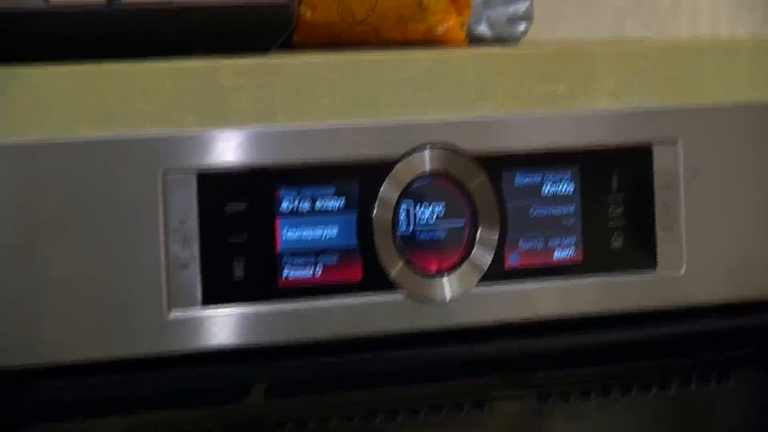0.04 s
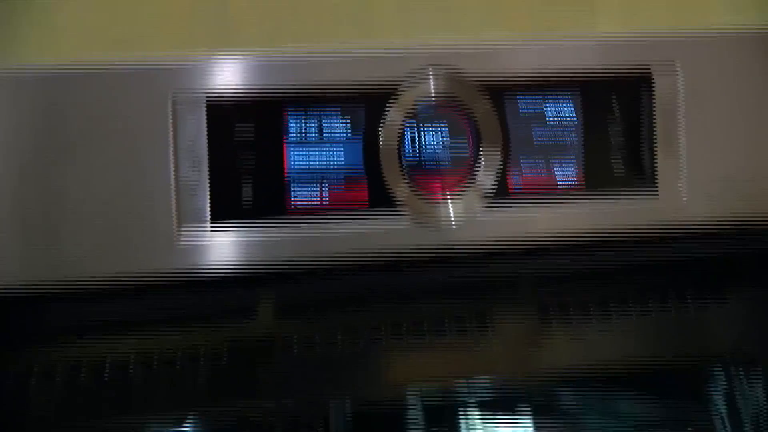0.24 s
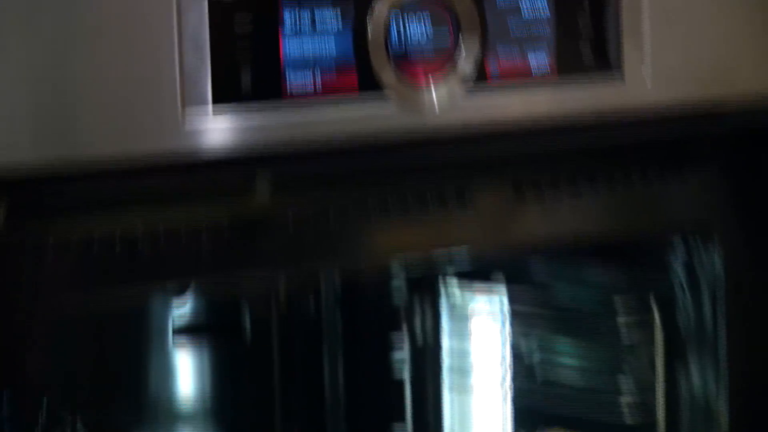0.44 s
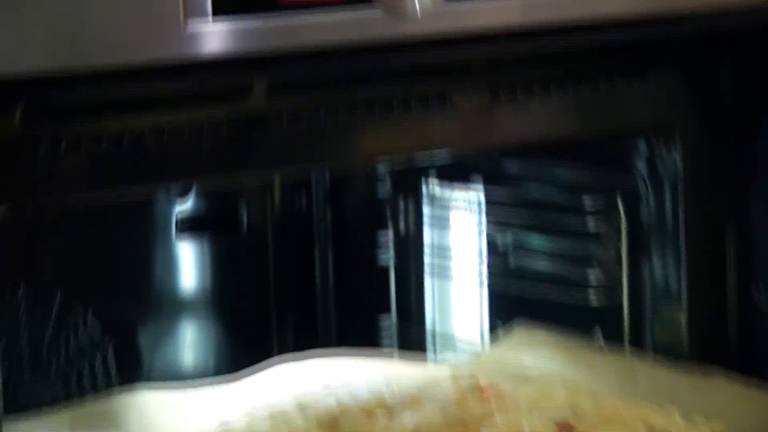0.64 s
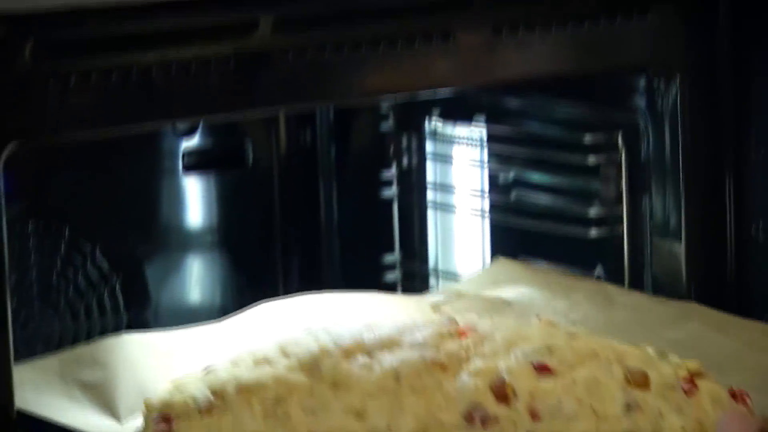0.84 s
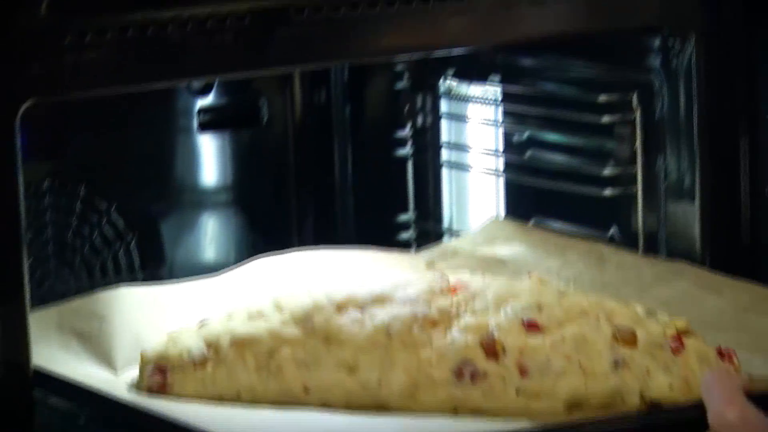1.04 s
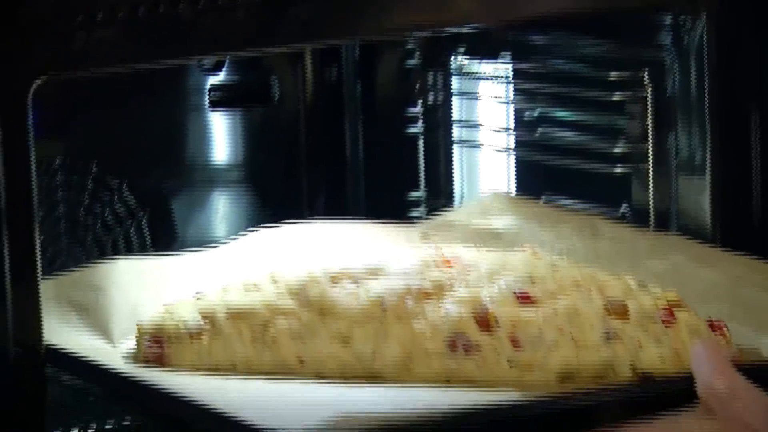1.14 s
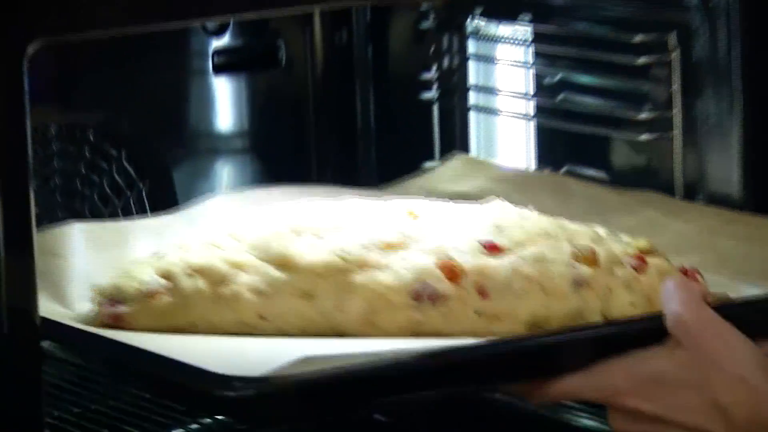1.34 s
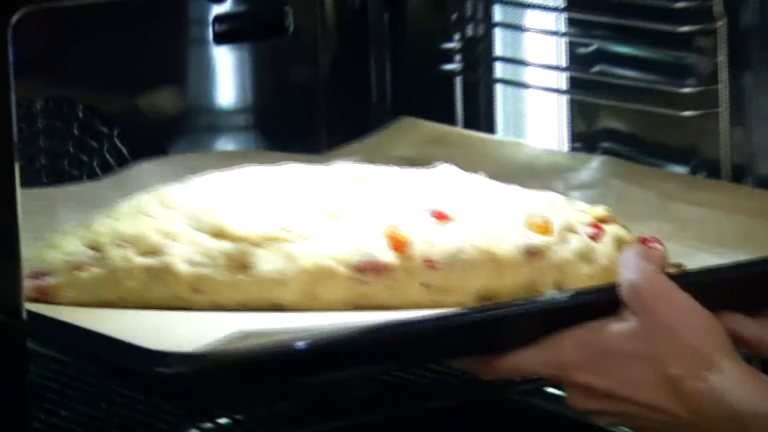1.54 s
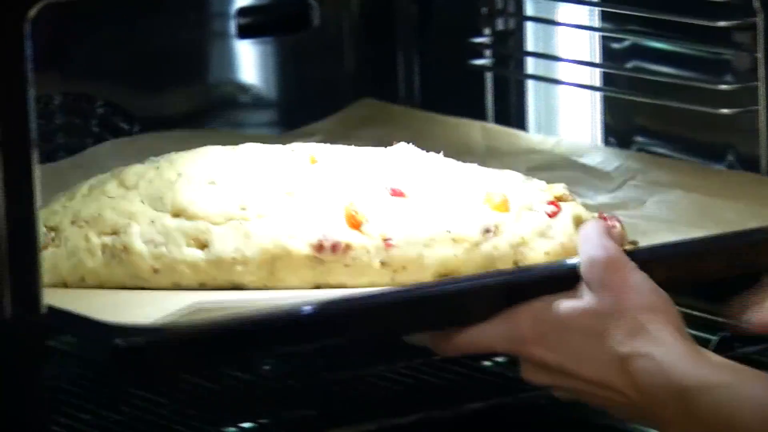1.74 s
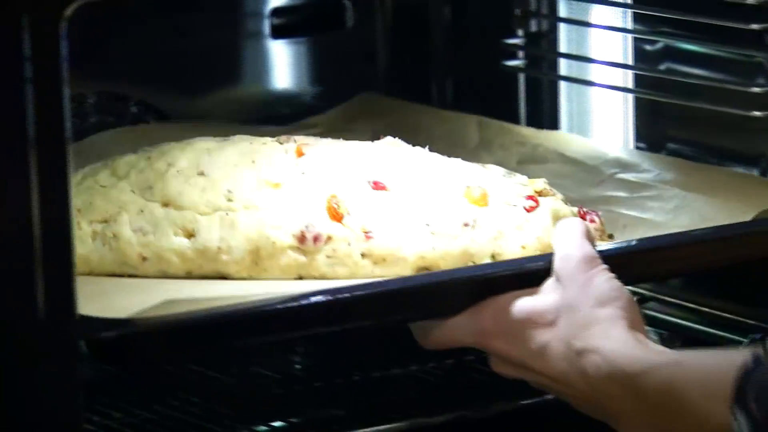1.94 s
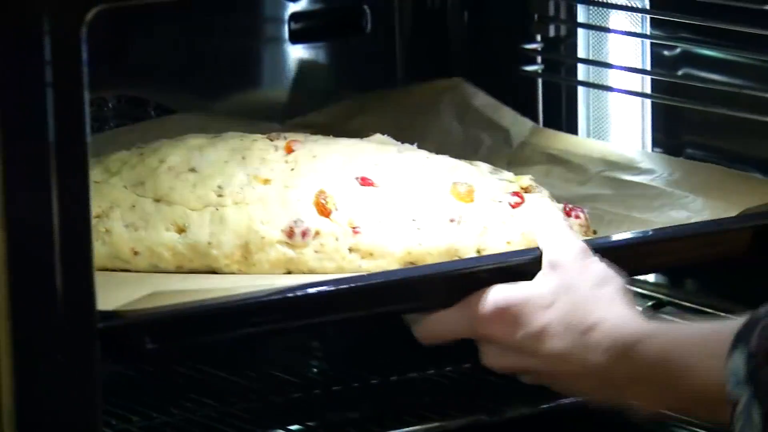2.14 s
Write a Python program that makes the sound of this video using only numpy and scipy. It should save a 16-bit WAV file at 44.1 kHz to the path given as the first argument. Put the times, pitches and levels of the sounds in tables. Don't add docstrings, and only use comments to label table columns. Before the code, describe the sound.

A metal baking tray goes into an oven. After a faint scuff, dull knocks come at 0.3 and 0.5 seconds. At 0.9 it lands with a hard clang and quick bounces, drags quietly, then catches and scrapes from 1.3. Loud clattering jolts at 1.65 to 1.95 fade into small ticks and scuffs by 2.2. A low fan hums throughout; the kitchen rings briefly.

```python
import sys
import numpy as np
from scipy import signal
from scipy.fft import rfft, irfft, next_fast_len
from scipy.io import wavfile
from scipy.ndimage import uniform_filter1d, map_coordinates

SR = 44100
rng = np.random.default_rng(int(sys.argv[2]) if len(sys.argv) > 2 else 0)


def gain_from_db(level_db):
    decades = np.asarray(level_db, float) / 20
    return 10 ** decades


def transcribe(signal):
    frames = np.atleast_2d(signal).T
    limited = np.clip(frames, -1, 1)
    pcm = np.round(limited * 32767).astype(np.int16)
    wavfile.write(sys.argv[1], SR, pcm)


N = 96843

# centre_hz, width_hz, level_db [dB over the sheet's hiss]
SHEET_MODES = [(1170, 61, 10), (1430, 28, 12), (1927, 280, 3.5), (2236, 530, 11), (2765, 170, 3),
               (3500, 110, 3), (4030, 190, -6), (5120, 76, -3), (6500, 114, -20), (6600, 420, 0),
               (8000, 270, -6), (9940, 110, 8)]


def unit(x):
    return x / np.sqrt(np.mean(x ** 2) + 1e-20)


def along(points, hz):
    f, v = np.transpose(points)
    return np.interp(np.log(hz + 1), np.log(f + 1), v)


def wobble(rate):
    knots = rng.standard_normal(int(N * rate / SR) + 4)
    return map_coordinates(knots, [np.arange(N) * rate / SR])


def filtered(x, response):
    m = next_fast_len(x.shape[-1] + 8192)
    return irfft(rfft(x, m) * response(np.fft.rfftfreq(m, 1 / SR)), m)[..., :x.shape[-1]]


def causal(points):
    def response(hz):
        cepstrum = irfft(np.log(gain_from_db(along(points, hz)) + 1e-6))
        half = len(cepstrum) // 2
        cepstrum[1:half] *= 2
        cepstrum[half + 1:] = 0
        bins = np.arange(len(hz))
        return np.interp(bins, bins, np.exp(rfft(cepstrum)))
    return response


def ringing(peaks, ring_db):
    def response(f):
        modes = sum(gain_from_db(db) * 1j * f * w / (c * c - f * f + 1j * f * w) for c, w, db in peaks)
        return 1 + gain_from_db(ring_db) * modes
    return response


def tilted(x, db_per_octave):
    return filtered(x, lambda hz: gain_from_db(db_per_octave * np.log2((hz + 100) / 3000)))


def patchy(x, depth_db):
    z = signal.stft(x, nperseg=256)[2]
    field = uniform_filter1d(rng.standard_normal(z.shape), 6, 0)
    field = uniform_filter1d(field, 9, 1)
    return signal.istft(z * gain_from_db(depth_db * unit(field)), nperseg=256)[1][:N]


def blows(rows, spike, rise):
    clank, thump = np.zeros((2, N + SR)), np.zeros((2, N + SR))
    t = np.arange(SR // 8) / SR

    def with_pulse(v):
        return np.array([v, np.linalg.norm(v) * (t == 0)])

    for s, db, thump_db, contact, hard_db in rows:
        rough, push = rng.standard_normal((2, len(t)))
        body = gain_from_db(-26 * t / contact) * (1 - np.exp(-t / rise))
        chatter = rough * (body + spike * gain_from_db(-60 * t / 0.0025))
        hardness = causal([(500, -1.6 * hard_db), (5000, 0), (16000, 2.0 * hard_db)])
        push = push * gain_from_db(db + thump_db - 26 * t / (3.33 * contact))
        push = push * (1 - np.exp(-t / 0.0039))
        at = slice(round(s * SR), round(s * SR) + len(t))
        clank[:, at] += gain_from_db(db) * filtered(with_pulse(chatter), hardness)
        thump[:, at] += with_pulse(push)
    return clank[:, :N], thump[:, :N]


def tray(forces, bright, heavy, modes, ring_db, high_db, low_db):
    high = filtered(filtered(forces[0], causal(bright)), ringing(SHEET_MODES, ring_db))
    low = filtered(filtered(forces[1], causal(heavy)), ringing(modes, -1.6))
    return gain_from_db(high_db) * high + gain_from_db(low_db) * low


def bumps():
    # start_s, peak_db, thump_db [over the clank], contact_s, hardness [dB per octave]
    landings = [
        (.9045, -4.5, -8, 0.026, -5),
        (.9105, -6, -21, .006, -3),
        (.9299, 1.5, -4, 0.0099, 2.3),
        (.9325, -5.5, -4, 0.014, -2),
        (.9773, -4.5, -1.5, 0.0065, -1.2),
        (.9915, -6.5, -11, 0.0076, -2),
        (1.0364, -13.5, -12, 0.01, -1),
        (1.3112, -8.5, -20, .012, -1),
        (1.4078, -14, -5, 0.012, -10),
        (1.4862, -10, -6, 0.014, 2.5),
    ]
    # start_s, peak_db, thump_db [over the clank], contact_s, hardness [dB per octave]
    jolts = [(1.5728, -13.5, -24, 0.024, 2), (1.6616, 0.5, -12, 0.0093, 1.9),
             (1.6655, -9, -4.5, 0.018, -1.3), (1.7724, -6, 3, 0.018, -3.5), (1.8173, 1, 1, 0.011, 3.6),
             (1.8542, -1, -2.5, 0.022, 2.3), (1.8904, -5, -3, 0.019, -1.5), (1.9214, -7, -5, 0.016, 2),
             (1.9565, -10, 0.5, 0.024, -1.9), (1.9664, -10.5, -4, 0.015, -1.5),
             (2.0595, -15, -4, 0.036, -2.5)]
    # freq_hz, level_db
    click = [(350, -24), (600, -19), (1630, -13), (6790, -11.5), (7380, -18), (8020, -11.5), (14400, -31),
             (16500, -45)]
    # freq_hz, level_db
    rattle = [(350, -10.5), (600, -9.5), (1100, -9.5), (2000, -8.5), (3500, -6), (6500, -6.5), (15200, -29),
              (16500, -47)]
    # freq_hz, level_db
    thud = [(24, -60), (40, -4), (70, -21.5), (139, 0.5), (236, -17), (642, -4), (952, -14), (1500, -21),
            (1950, -30), (3300, -120)]
    # centre_hz, width_hz, level_db [over the sheet's hiss]
    low_modes = [(123, 17, 2.5), (167, 22, 1.5), (433, 62, 4.5), (557, 50, -9), (667, 71, 1.5),
                 (867, 100, 1.5)]
    landed = tray(blows(landings, 2.48, 0.00056), click, thud, low_modes, -5.5, high_db=2.0, low_db=7.5)
    jolted = tray(blows(jolts, 0.54, 0.00073), rattle, thud, low_modes, -9.5, high_db=5, low_db=7.5)
    return landed + jolted


def slide():
    # time_s, pressure_db, speed [-1..1], weight_db [on the rack]
    strokes = [(.95, -41.5, -0.58, 23.5), (1.078, -41, 0.6, -8), (1.2, -37, 0.32, -3.5),
               (1.309, -31.5, -0.016, -21), (1.313, -25.5, -0.21, -6.5), (1.38, -24.5, 0.17, -2),
               (1.47, -24, 0.15, -11.5), (1.55, -29.5, 0.77, -4.5), (1.64, -21.5, 0.061, -11),
               (1.71, -26.5, 0.14, 4), (1.77, -29.5, 0.24, 6.5), (1.9, -24.5, 0.13, 0.5),
               (1.99, -30.5, -0.2, 0.5), (2.12, -32.5, -0.99, -10), (2.19, -32, 0.87, -5)]
    # freq_hz, level_db per Hz
    rasp_colour = [(180, -6), (300, -23), (337, -12), (418, 7.5), (1170, 5.5), (1300, 6.5), (2170, 1),
                   (7200, -1.5), (16000, -19.5)]
    # freq_hz, level_db per Hz
    rumble_colour = [(24, -57.5), (40, -35), (136, -3.5), (318, -5.5), (641, -10), (1000, -19), (1300, -46),
                     (2200, -120)]
    # centre_hz, width_hz, level_db
    bar_modes = [(140, 41, 4.5), (274.2, 16.3, 9), (430, 45, 5.5), (572, 45, 9), (640, 24, 9.5)]
    s, *cols = np.transpose(strokes)
    t = np.arange(N) / SR
    press_db, speed, weight_db = [np.interp(t, s, c) for c in cols]
    on = np.clip((t - s[0]) / 0.022, 0, 1)

    grains_per_s, grain_db, grit = 2000, 5, 0.45
    grains = (rng.random(N) < grains_per_s / SR) * gain_from_db(grain_db * rng.standard_normal(N))
    grains = grains * rng.choice([-1, 1], N)
    force = np.sqrt(1 - grit) * rng.standard_normal(N) + np.sqrt(grit) * unit(grains)
    force = force * gain_from_db(2.2 * wobble(59.93))
    rasp = filtered(filtered(patchy(force, depth_db=2.3), causal(rasp_colour)), ringing(SHEET_MODES, -7.5))

    fast = np.clip((speed + 1) / 2, 0, 1)
    tilt_db = 3
    rasp = fast * unit(tilted(rasp, tilt_db)) + (1 - fast) * unit(tilted(rasp, -tilt_db))
    rumble = filtered(filtered(rng.standard_normal(N), causal(rumble_colour)), ringing(bar_modes, 5.6))
    rumble_gain = gain_from_db(-6.5 + weight_db + 2.5 * wobble(25.35))
    return on * gain_from_db(press_db) * (rasp + rumble_gain * unit(rumble))


def knocks():
    # start_s, peak_db, thump_db [over the clank], contact_s, hardness [dB per octave]
    hits = [
        (.2916, -21, 2, .004, -7),
        (0.2932, -6.5, 4, 0.014, -5.5),
        (0.511, -7.5, -6, 0.02, -2.5),
    ]
    # freq_hz, level_db per Hz
    clank_colour = [(350, -6.5), (600, -16.5), (1020, 0), (1440, -23), (1790, -3), (6980, -11.5),
                    (15200, -28), (16500, -48)]
    # freq_hz, level_db per Hz
    thump_colour = [(24, -51), (40, -36), (123, 2), (229, -11.5), (520, -5.5), (752, -9.5), (2200, -19.5),
                    (2860, -19), (4840, -120)]
    # centre_hz, width_hz, level_db
    dull_modes = [(125, 29, 0), (372, 20, 4), (527, 31, 0.5), (882, 44, 12), (1504, 156, 14.5)]
    # freq_hz, level_db
    to_walls = [(150, -1.5), (700, 1.5), (2400, -1), (3600, 2), (6000, -2), (12000, 9)]
    forces = blows(hits, 1.97, 0.001)
    near, pulses = tray(forces, clank_colour, thump_colour, dull_modes, -12.5, high_db=0.5, low_db=8.5)
    return np.array([near, filtered(pulses, causal(to_walls))])


def struck_modes(rows, rise):
    out, t = np.zeros(N), np.arange(N) / SR
    for s, hz, db, t60 in rows:
        u = np.maximum(t - s, 0)
        envelope = gain_from_db(db - 60 * u / t60) * (1 - np.exp(-u / rise))
        out += envelope * np.sin(2 * np.pi * hz * u + .5 * wobble(120))
    return out


def pings_and_booms():
    # start_s, pitch_hz, level_db, t60_s
    pings = [(.9047, 2100, -20, .05), (1.038, 2100, -20, .06), (1.312, 2080, -18, .054),
             (1.313, 970, -18, .11), (1.408, 2100, -19, .05), (1.866, 2400, -18, .12),
             (2.062, 2290, -19, .09), (2.064, 2360, -25, .06), (2.158, 2100, -28, .04)]
    # start_s, pitch_hz, level_db,
    # t60_s
    booms = [(.2925, 510, -19, .2), (.293, 385, -17, .13), (.298, 131, -15, .22), (.3, 1670, -25, .2),
             (.515, 133, -25, .4), (.935, 155, -19, .25), (1.19, 270, -32, .7), (1.35, 268, -22, .5),
             (1.55, 263, -28, .5), (1.7, 115, -24, .5), (1.775, 680, -17, .12), (1.82, 655, -15, .15),
             (1.825, 133, -15, .5), (1.858, 620, -16, .2)]
    near = struck_modes(pings, rise=0.00092) + struck_modes(booms, rise=0.013)
    return near * [[1], [.25]]


def brush_strokes(rows, peak):
    out, t = np.zeros(N), np.arange(N) / SR
    for s, length, db, hz, spread in rows:
        grit = rng.standard_normal(N) * gain_from_db(5 * rng.standard_normal(N))
        hiss = filtered(grit, lambda f: gain_from_db(-12 * np.abs(np.log2((f + 1) / hz) / spread)))
        u = (t - s) / length
        swell_db = np.where(u < peak, -10.5 * (1 - u / peak), -22 * (u - peak) ** 2)
        out += gain_from_db(db + 1.3 * wobble(90.6)) * (u > 0) * gain_from_db(swell_db) * unit(hiss)
    return out


def scuffs():
    # start_s, length_s, level_db, centre_hz, spread_octaves
    brushes = [(0.037, 0.15, -36, 9000, 2.6), (0.065, 0.14, -38.5, 3000, 1.24), (.15, .04, -56, 3300, .3),
               (1.43, 0.026, -20.5, 2300, 0.77), (2.129, 0.013, -30.5, 6000, 1.1),
               (2.15, 0.018, -19.5, 4230, 1.5), (2.192, .012, -29, 9100, 0.93)]
    # start_s, length_s, level_db, centre_hz, spread_octaves
    catches = [(.085, 0.096, -37, 794, 0.47), (1.311, 0.14, -27, 7600, 0.57),
               (1.407, 0.066, -29.5, 2060, 0.37), (1.773, .04, -25.5, 6500, 0.63),
               (1.819, 0.015, -11, 6500, 0.55), (1.855, 0.024, -14, 5430, 1),
               (1.892, 0.013, -21, 5000, 1.4), (2.1355, 0.022, -19.5, 4930, 1.1)]
    return brush_strokes(brushes, peak=.3) + brush_strokes(catches, peak=.04)


def echo(x, t60s, count=9):
    out, at = np.zeros(N), np.arange(N) * (count - 1) / N
    for k in range(count):
        hz, t, z = signal.stft(rng.standard_normal(SR), SR, nperseg=256)
        decay = gain_from_db(-60 * t / along(t60s, hz)[:, None])
        tail = signal.istft(z * decay, SR, nperseg=256)[1]
        part = x * np.cos(np.pi / 2 * np.clip(at - k, -1, 1))
        out += signal.fftconvolve(np.pad(part, (150, 0)), tail / np.linalg.norm(tail))[:N]
    return out


def oven_and_kitchen(pulses):
    # freq_hz, t60_s
    kitchen = [(100, 0.87), (500, 0.71), (1500, 0.49), (4000, 0.36), (10000, 0.17)]
    return gain_from_db(-4) * echo(pulses, kitchen) + gain_from_db(-9.5) * echo(pulses, [(1000, 0.035)])


def fan():
    # freq_hz, level_db per Hz
    air_colour = [(20, -48), (60, -12), (110, -5.5), (250, -13), (800, -13.5), (1100, -16), (5000, -30.5),
                  (16000, -41)]
    # pitch_hz, level_db
    motor = [(96, -45), (197, -52), (295, -55.5)]
    # centre_hz, width_hz, level_db
    whistles = [(4480, 42, -66)]
    t = np.arange(N) / SR
    air = unit(filtered(rng.standard_normal(N), lambda hz: gain_from_db(along(air_colour, hz))))
    out = gain_from_db(-43 + 0.23 * wobble(6.1)) * air
    for hz, db in motor:
        out += gain_from_db(db + 2.4 * wobble(14)) * np.sin(2 * np.pi * hz * t + wobble(12))
    for c, w, db in whistles:
        out += gain_from_db(db) * unit(filtered(rng.standard_normal(N), lambda f: 1 / (1 + ((f - c) / w) ** 4)))
    return out


def scene():
    near, pulses = bumps() + slide() + knocks() + pings_and_booms()
    strokes = scuffs()
    near = near + strokes
    pulses = pulses + gain_from_db(-6.5) * strokes
    return (near + oven_and_kitchen(pulses) + fan())[None]


def top_cut(x):
    return signal.sosfilt(signal.butter(12, 16870, fs=SR, output="sos"), x)


def record(dry):
    # freq_hz, level_db
    mic = [(20, -29), (45, -11.5), (90, -1), (200, 1.5), (15000, -1.5)]
    x = filtered(dry, causal(mic))
    x = filtered(x, lambda hz: 1 / (1 + (hz / 15760) ** 300))
    ceiling = 1.05
    mix = x / (1 + np.abs(x / ceiling) ** 10) ** (1 / 10)
    return top_cut(mix)


dry = scene()
out = record(dry)
transcribe(out)
```